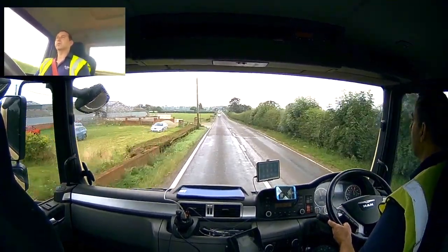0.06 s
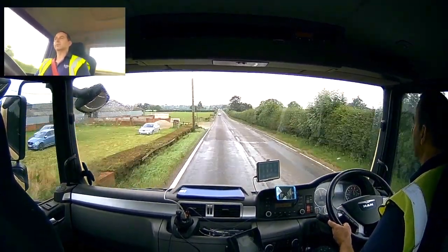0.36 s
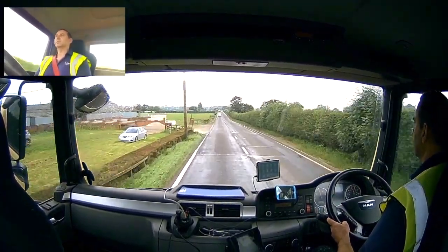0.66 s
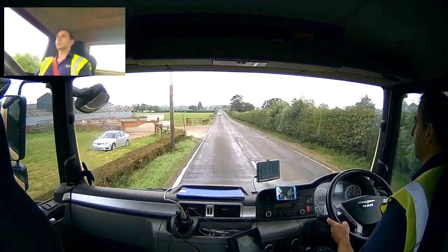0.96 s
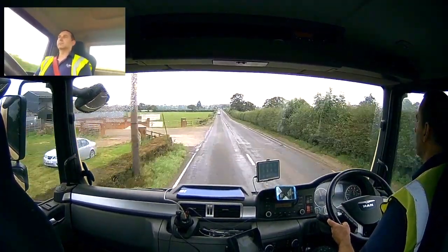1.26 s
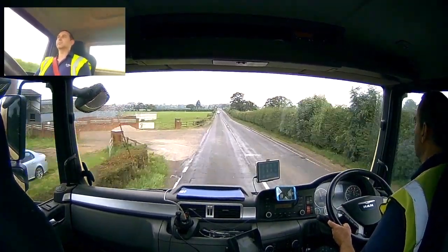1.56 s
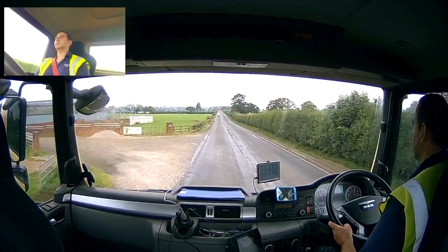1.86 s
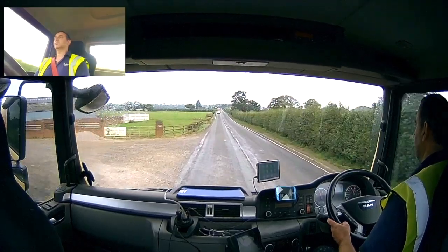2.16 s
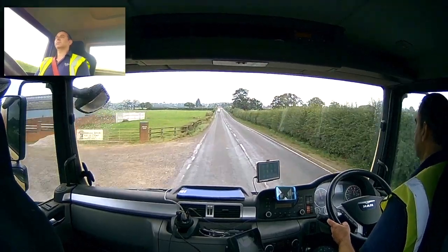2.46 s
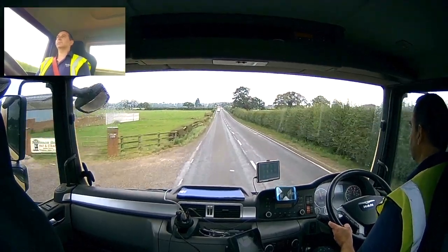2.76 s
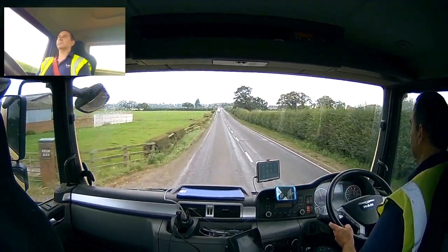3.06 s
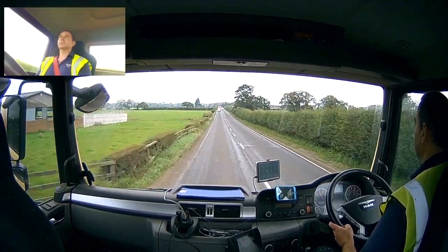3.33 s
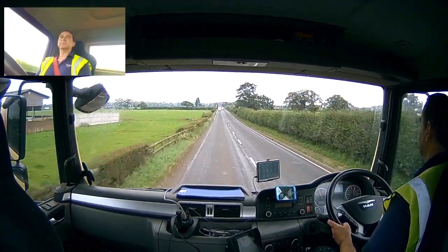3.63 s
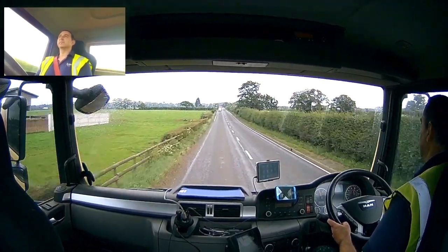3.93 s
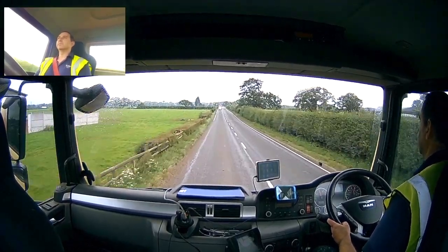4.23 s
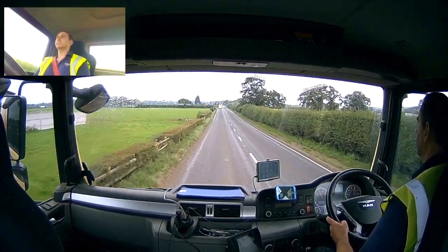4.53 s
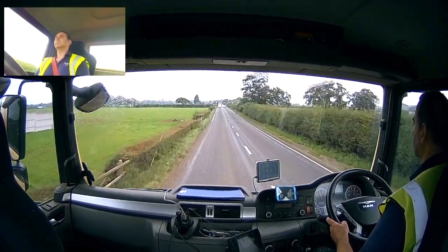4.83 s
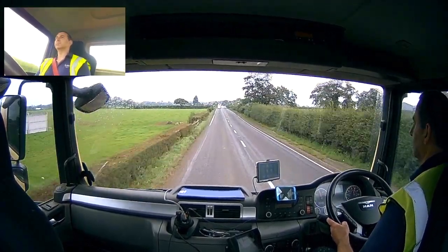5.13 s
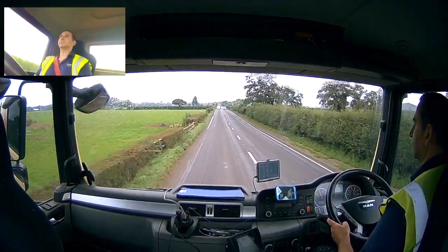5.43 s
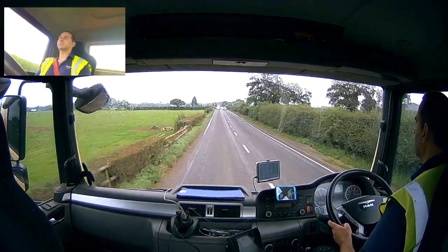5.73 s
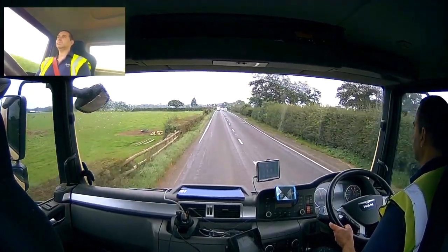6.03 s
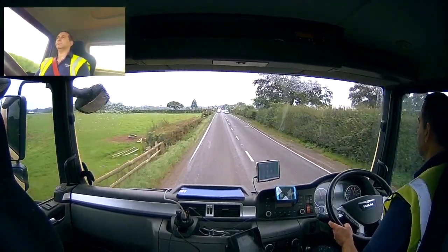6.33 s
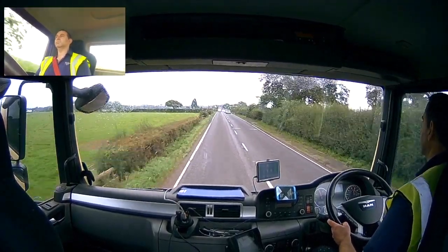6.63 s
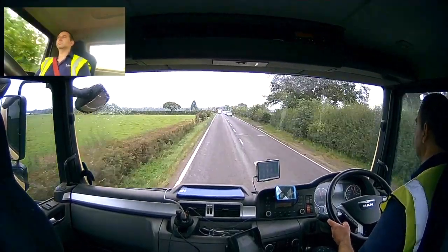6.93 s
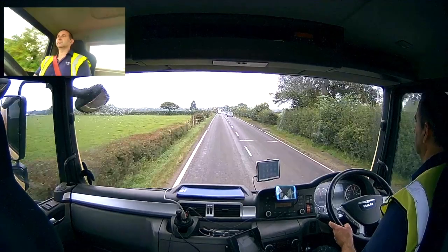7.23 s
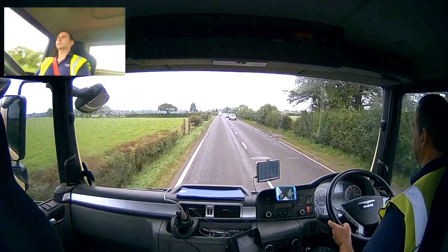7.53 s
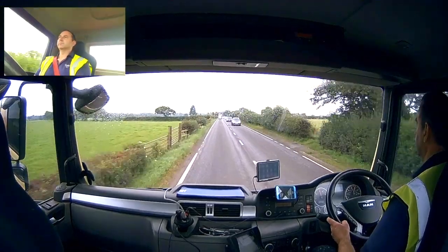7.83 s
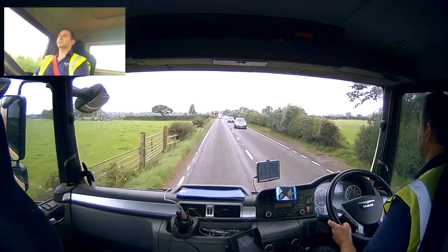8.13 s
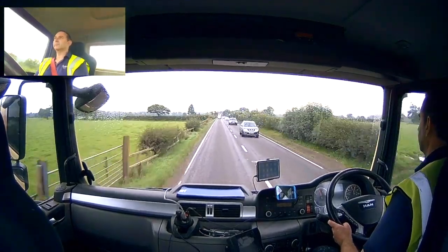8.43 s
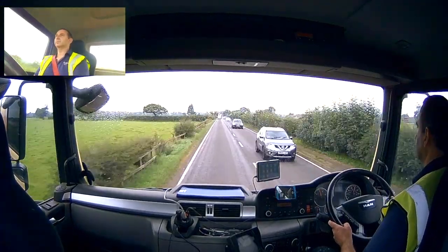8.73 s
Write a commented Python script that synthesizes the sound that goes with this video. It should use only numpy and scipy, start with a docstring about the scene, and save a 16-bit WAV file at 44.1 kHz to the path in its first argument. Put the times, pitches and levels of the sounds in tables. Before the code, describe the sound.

A heavy diesel truck drones inside its cab, with deep road rumble, wet tyre hiss and rattling plastic trim.

```python
"""A heavy six-cylinder truck diesel at about 1500 rpm, heard in the cab on a wet country road.
Uneven firings knock through the engine cover, clatter in the block and shake a loose panel and a clip.
The firing hum swells for a while over thin gear whines. Road rumble and tyre roar fill the cab, and
its air booms for a moment. Wet tyres hiss and splash; plastic trim creaks, ticks and clacks on bumps."""
import sys
import numpy as np
from scipy import signal
from scipy.fft import rfft, irfft, next_fast_len
from scipy.io import wavfile
from scipy.ndimage import uniform_filter1d

SR = 44100
rng = np.random.default_rng(int(sys.argv[2]) if len(sys.argv) > 2 else 0)


def waveform_to_disk(signal):
    """Save audio, clipped to [-1, 1], as 16-bit WAV at the path in sys.argv[1]."""
    frames = np.transpose(np.atleast_2d(signal))
    scaled = np.clip(frames, -1, 1) * 32767
    samples = np.round(scaled).astype(np.int16)
    wavfile.write(sys.argv[1], SR, samples)


N = 387198

# Cylinders in firing order. Each row: knock in dB, panel buzz in dB.
CYLINDERS = [(2.5, -2.5), (-16.5, -6.5), (-11, -5), (-6.5, 0.5), (-1, -1), (-7, -19.5)]
# Engine load. Each row: time in seconds, knock and clatter in relative dB.
LOAD = [(0, -44, -43), (1.4, -36.5, -44), (2, -40.5, -45.5), (2.6, -40, -53.5), (3, -40.5, -43.5),
        (3.5, -34.5, -43), (4.3, -35, -43.5), (5, -39.5, -41.5), (5.7, -38, -41), (6.3, -42.5, -39),
        (7.1, -41, -37), (8.78, -43.5, -41.5)]
# Road surface. Each row: time in seconds, rumble and tyre roar in relative dB.
SURFACE = [(0, -16, -25), (1.3, -21.5, -26), (2.4, -19.5, -27), (3.3, -17, -25.5), (4.4, -17.5, -26),
           (5.4, -17, -25), (6.6, -17.5, -24.5), (7.2, -16.5, -24.5), (7.6, -18.5, -25),
           (8.78, -19.5, -25.5)]
# Cab rumble. Each row: frequency in Hz, gain in dB.
RUMBLE_SPECTRUM = [(18, -18), (28, -16.5), (40, -2), (50, -13.5), (64, 2), (76, -6), (100, 1.5), (140, 0),
                   (180, -1.5), (215, -8), (280, -17.5), (450, -40.5)]
# Ring of the plastic trim. Each row: frequency in Hz, gain in dB.
TRIM_SPECTRUM = [(800, 6.5), (1800, 14.5), (3600, 3), (5500, -4.5), (7200, -7), (9500, -8), (11000, -11.5),
                 (12800, -10.5), (15500, -17)]


def undb(db):
    """Decibels to gain."""
    return 10 ** (np.asarray(db) / 20)


def unit(x):
    """Scale to rms 1."""
    return x / np.sqrt(np.mean(x ** 2))


def curves(table):
    """Each column of (seconds, ..) rows, interpolated per sample."""
    s, *columns = np.transpose(table)
    return [np.interp(np.arange(N) / SR, s, c) for c in columns]


def stretches(table, edge_s):
    """Gain of (start s, length s, dB) rows that fade in, hold and fade out."""
    t = np.arange(N) / SR
    return sum(undb(db) * np.clip(np.minimum(t - s, s + length_s - t) / edge_s + .5, 0, 1)
               for s, length_s, db in table)


def response(points, hz):
    """Gain of (Hz, dB) points on a log-frequency axis."""
    f, db = np.transpose(points)
    return undb(np.interp(np.log(hz + 1), np.log(f), db))


def colour(x, points):
    """Filter by a (Hz, dB) spectrum that falls away beyond its ends."""
    size = next_fast_len(N, real=True)
    hz = np.fft.rfftfreq(size, 1 / SR)
    ends = np.minimum(hz / points[0][0], 1) ** 2 / np.maximum(hz / points[-1][0], 1) ** 2
    return irfft(rfft(x, size) * response(points, hz) * ends, size)[..., :N]


def pan(db):
    """Stereo gains for a pan of left minus right in dB."""
    return undb(np.array([[db], [-db]]) / 2)


def resonate(x, hz, width_hz):
    """One resonance, unity gain at its peak."""
    return signal.lfilter(*signal.iirpeak(hz, hz / width_hz, SR), x)


def ring(x, modes):
    """Drive resonances, each with its own place in the cab."""
    return sum(undb(db) * pan(pan_db) * resonate(x, hz, width_hz) for hz, width_hz, db, pan_db in modes)


def walk(rate_hz):
    """Slow drift: random steps smoothed twice, rms 1."""
    hold = int(SR / rate_hz)
    steps = np.repeat(rng.standard_normal(N // hold + 1), hold)
    return unit(uniform_filter1d(uniform_filter1d(steps, hold), hold)[:N])


def bursts(hits, decay_s):
    """Each impulse starts a decaying burst of stereo noise."""
    return signal.lfilter([1], [1, -np.exp(-1 / (decay_s * SR))], hits) * rng.standard_normal((2, N))


def grains(per_s, spread_db, decay_s):
    """Tiny bursts of random timing and size."""
    hits = rng.random(N) < per_s / SR
    sizes = undb(spread_db * np.minimum(rng.exponential(size=N), 3))
    return bursts(hits * sizes, decay_s)


def cab_noise():
    """Noise in a small cab: long waves reach both sides alike, short ones do not."""
    # Stereo width. Each row: frequency in Hz, side minus mid in dB.
    width = [(40, -16.5), (125, -18), (250, -10.5), (500, -9), (1000, 2.5), (2000, -0.5)]
    size = next_fast_len(N, real=True)
    mid, side = rng.standard_normal((2, size))
    side = irfft(rfft(side) * response(width, np.fft.rfftfreq(size, 1 / SR)), size)
    return np.array([mid + side, mid - side])[:, :N]


def standing_waves(x):
    """The cab's standing waves bring one source to the two sides out of step."""
    # Phase between sides. Each row: frequency in Hz, left lead in radians.
    leads = [(700, 0), (1250, .4), (1450, 1.4), (1750, 3), (2550, 3.3), (2950, 6.2), (3500, 6.3),
             (4200, 3.8)]
    size = next_fast_len(N, real=True)
    lead_rad = np.interp(np.fft.rfftfreq(size, 1 / SR), *np.transpose(leads))
    return irfft(rfft(x, size) * np.exp(.5j * np.array([lead_rad, -lead_rad])), size)[:, :N]


def near_noise(diffuse_db=-5):
    """Noise of one nearby part, with diffuse sound around it."""
    return standing_waves(rng.standard_normal(N)) + undb(diffuse_db) * rng.standard_normal((2, N))


def cab_walls(x, count=8, gain=0.19):
    """Glass and dash return different early echoes to each side."""
    lags = (rng.uniform(0.0011, .012, (2, count)) * SR).astype(int)
    return np.array([side + gain * sum(np.roll(side, lag) for lag in row) for side, row in zip(x, lags)])


def firings(cycles, cylinder_db, scatter_db, decay_s):
    """Force of six firings a cycle: each has its own strength and dies away."""
    count = len(cylinder_db)
    number = (cycles * count).astype(int)
    age_s = (cycles - number / count) / np.gradient(cycles) / SR
    chance = rng.standard_normal(number[-1] + 1)
    return undb(cylinder_db[number % count] + scatter_db * chance[number]) * np.exp(-age_s / decay_s)


def knock(cycles, rasp=.17):
    """Combustion blows, rounded by the hollow under the engine cover, ring the cover."""
    # Cover modes. Each row: frequency and width in Hz, gain and pan in dB.
    cover_modes = [(1188, 17, -12.5, 4), (1253, 42, 0.5, -4.5), (1392, 40, -3.5, -10.5)]
    force = firings(cycles, np.transpose(CYLINDERS)[0], scatter_db=.7, decay_s=0.02)
    blow = np.maximum(np.diff(force, prepend=force[0]), 0)
    push = (unit(blow) + rasp * unit(force * rng.standard_normal(N))) * undb(.8 * walk(4))
    hollow = resonate(push, hz=1270, width_hz=190)
    cover = ring(standing_waves(hollow), cover_modes)
    cover = colour(cover, [(950, -16), (1150, 4.5), (1260, 0), (1370, -6), (1700, -10.5)])
    return unit(cover) * undb(curves(LOAD)[0] - 2)


def clatter(cycles):
    """All six cylinders ring the block, more evenly than they knock."""
    # Block modes. Each row: frequency and width in Hz, gain and pan in dB.
    block_modes = [(1449, 45, 3.5, -5.5), (1540, 67, -8, -13), (1525, 110, -2.5, -10), (1660, 23, -8, -6),
                   (1769, 20, -2.5, -7), (2000, 76, -14.5, -2)]
    force = firings(cycles, 0.2 * np.transpose(CYLINDERS)[0], scatter_db=0.8, decay_s=0.07)
    block = colour(ring(force * near_noise(), block_modes), [(1100, 0), (2200, -0.5)])
    return unit(block) * undb(curves(LOAD)[1] + 1.5)


def panel_buzz(cycles):
    """The firings shake a loose panel; its level follows the clatter."""
    # Panel modes. Each row: frequency and width in Hz, gain and pan in dB.
    panel_modes = [(2464, 76, -1, -14), (2568, 24, 3.5, -27), (3273, 65, -1.5, 8.5), (3770, 22, 2.5, -1.5),
                   (3935, 60, -8, -7)]
    shake = firings(cycles, np.transpose(CYLINDERS)[1], scatter_db=3, decay_s=0.049)
    panel = ring(shake * near_noise(), panel_modes)
    panel = colour(panel, [(2000, 14), (2500, -1.5), (4000, 2.5), (5000, -7), (13000, -8.5)])
    return unit(panel) * undb(0.82 * curves(LOAD)[1] - 15)


def clip_rattle(cycles):
    """The firings shake a small clip into fine bright ticks."""
    # Shake per cylinder in dB.
    shake_db = [-4.5, -6.5, -6.5, -11.5, -4, -8.5]
    # Clip modes. Each row: frequency and width in Hz, gain and pan in dB.
    clip_modes = [(6400, 700, 0, -4.5), (9500, 1800, -1.5, 4.5), (12650, 670, -4.5, 7)]
    shake = firings(cycles, np.array(shake_db), scatter_db=3, decay_s=.003)
    clip = colour(ring(shake * rng.standard_normal((2, N)), clip_modes), [(6000, 0.011), (13000, 0)])
    return unit(clip) * undb(0.36 * curves(LOAD)[1] - 55)


def hum(cycles):
    """Harmonics of the firing rate waver in level and phase."""
    # Hum partials. Each row: multiple of the firing rate, relative level in dB.
    harmonics = [(2, -3), (3, 2), (5, 3.5), (6, -4.5), (7, -6.5), (8, -28.5)]
    # Hum swell. Each row: time in seconds, level in dB.
    levels = [(0, -49), (3, -46), (5.4, -36.5), (6.1, -28), (7.1, -27.5), (7.8, -31.5), (8.8, -35)]
    firing_rad = 2 * np.pi * len(CYLINDERS) * cycles
    tones = 0
    for multiple, db in harmonics:
        gain = undb(db + 1.3 * walk(12))
        tones += gain * np.sin(multiple * firing_rad + 0.68 * walk(20) + rng.uniform(0, 2 * np.pi))
    return unit(tones) * undb(curves(levels)[0]) * pan(1.5)


def gear_whine(cycles):
    """Two gears whine thinly at high multiples of the engine cycle."""
    # Gear tones, upper then lower, in multiples of the cycle rate.
    multiples = [87.6, 72]
    # Pan per gear in dB.
    pans_db = [-9, -2]
    # Whine levels. Each row: time in seconds, upper and lower gear in dB.
    levels = [(0, -49.5, -64), (1.8, -48.5, -63), (2.3, -54, -62), (3.7, -55, -55), (4.4, -57, -48.5),
              (4.8, -63, -53), (7.1, -63, -48.5), (8.8, -63, -57)]
    whine = 0
    for multiple, pan_db, db in zip(multiples, pans_db, curves(levels)):
        gain = undb(db + 2 * walk(6.5)) * pan(pan_db)
        whine += gain * unit(np.sin(2 * np.pi * multiple * cycles + .5 * walk(10)))
    return whine


def road_swing_db():
    """Brief rounded surges and lulls of the road noise."""
    # Swells. Each row: centre and length in seconds, change in dB.
    swells = [(0.294, 0.2, -6), (0.832, 0.082, -4.5), (1.598, 0.35, 3), (1.738, 0.24, -4),
              (2.016, 0.16, -6), (2.532, 0.15, -4.5), (3.134, 0.14, -6), (4.855, 0.17, -8.5),
              (5.363, 0.15, -6.5)]
    t = np.arange(N) / SR
    return sum(db * np.cos(np.pi * np.clip((t - s) / length_s, -.5, .5)) ** 2
               for s, length_s, db in swells)


def rumble():
    """The road shakes the cab on its mounts."""
    return unit(colour(cab_noise(), RUMBLE_SPECTRUM)) * undb(curves(SURFACE)[0] + road_swing_db())


def bounce(rest_db=-40.5):
    """The cab bounces on its mounts with a deep shudder."""
    # Bounces. Each row: start and length in seconds, level in dB.
    bounces = [(0, 0.88, -29.5), (3, 0.26, -33)]
    shudder = colour(cab_noise(), [(22, -2.5), (30, -6), (38, 6.5), (52, -6), (80, -10)])
    return unit(shudder) * (undb(rest_db) + stretches(bounces, edge_s=0.21)) * pan(-1)


def tyre_roar(cycles):
    """Tyre noise booms in the cab's panels; the firings throb through it."""
    # Roar. Each row: frequency in Hz, gain in dB.
    spectrum = [(120, -12.5), (260, 1), (340, 1.5), (420, -2), (490, -2), (620, -3.5), (690, -7),
                (800, -13), (1050, -17.5), (1400, -19), (1750, -28), (2050, -31.5), (3500, -36.5),
                (6000, -52)]
    # Cab panel modes. Each row: frequency and width in Hz, gain and pan in dB.
    boom_modes = [(484.4, 57, -5, 9.5), (599.6, 16.2, 1.5, -4.5)]
    throb = 1 + 0.079 * np.cos(2 * np.pi * len(CYLINDERS) * cycles)
    tyres = colour(cab_noise(), spectrum) * throb
    level_db = curves(SURFACE)[1] + 0.44 * road_swing_db() + 1.37
    return unit(tyres + ring(tyres, boom_modes)) * undb(level_db)


def tyre_water(onset_s=0.028, runoff_s=0.1):
    """Wet tyres throw a steady spray and splash through wetter patches."""
    # Spray hiss. Each row: frequency in Hz, gain in dB.
    hiss_spectrum = [(900, -6), (1800, 10.5), (2800, 4.5), (4200, 2.5), (5200, -3.5), (7000, -8),
                     (8700, -8.5), (10800, -17.5), (12600, -15.5), (15500, -22)]
    # Spray strength. Each row: time in seconds, level in dB.
    spray_levels = [(0, -46.5), (1, -52), (2.5, -52), (4, -50.5), (5.5, -50), (6.6, -48), (8.8, -48)]
    # Water on the wheel arch. Each row: frequency in Hz, gain in dB.
    splash_spectrum = [(1000, 7.5), (1800, 16.5), (2900, 3), (3900, 10), (5000, -3), (8500, -7),
                       (11000, -14.5), (13500, -12.5), (15500, -26)]
    # Wetter patches. Each row: start and length in seconds, level in dB.
    patches = [(5.33, .14, -49), (6.668, 0.15, -41), (7.192, 0.34, -46)]
    spray = unit(colour(cab_walls(cab_noise()), hiss_spectrum)) * undb(curves(spray_levels)[0])
    t = np.arange(N) / SR
    wetness = 0
    for s, length_s, db in patches:
        onset = np.clip((t - s) / onset_s + .5, 0, 1)
        wetness += undb(db) * onset * np.exp(-np.maximum(t - s - length_s, 0) / runoff_s)
    drops = grains(per_s=1000, spread_db=1, decay_s=0.0043)
    splash = unit(colour(drops, splash_spectrum)) * wetness
    return (spray + splash) * undb(0.88 * walk(14)) * pan(.8)


def trim_creak(rest_db=-62):
    """Plastic joints creak in many tiny slips, louder on rough road."""
    # Rough stretches. Each row: start and length in seconds, relative level in dB.
    rough = [(0, 0.26, -45), (.42, 0.35, -50.5), (2.86, 0.36, -51), (4.45, 0.2, -59), (7.99, 0.3, -45.5)]
    slips = grains(per_s=480, spread_db=2.5, decay_s=0.0018)
    gain = np.hypot(undb(rest_db), stretches(rough, edge_s=0.026)) * undb(3)
    return unit(colour(slips, TRIM_SPECTRUM)) * gain * pan(1.2)


def panel_chatter(cycles, touch_phase=.52, rise_s=0.004, decay_s=0.0081):
    """The loose panel's edge taps its frame once a cycle, now and then hard; it chirps and rings."""
    # Hard taps. Each row: start in seconds, edge chirp and ring in dB.
    hard_taps = [(1.14, -51, -43), (1.227, -47, -43), (1.479, -49.5, -45), (1.721, -37.5, -43),
                 (1.976, -49, -45), (3.404, -53, -41), (4.358, -47, -42), (4.518, -47, -43),
                 (4.6, -49, -40), (4.675, -54, -34.5), (4.753, -54, -44), (4.911, -45, -42),
                 (5.152, -48, -39), (5.231, -53, -41), (5.642, -43, -57), (6.662, -47, -36),
                 (6.735, -43, -37), (7.041, -48, -43), (7.122, -51, -38), (7.262, -47, -36),
                 (7.422, -46, -54), (7.511, -46, -38), (7.732, -45, -41), (7.891, -48, -40),
                 (8.284, -46, -41), (8.445, -49, -42), (8.546, -43, -52)]
    # Edge chirp. Each row: frequency in Hz, gain in dB.
    edge_spectrum = [(2000, -19.5), (2550, -1.5), (2900, -11), (3270, 6), (3520, 2.5), (3800, 12),
                     (4300, -28), (6000, -34)]
    # Modes of the tapped panel. Each row: frequency and width in Hz, gain and pan in dB.
    tap_modes = [(2446, 110, -2, -6), (2544, 41, 0, -6.5), (3230, 70, -9, 4.5)]
    touches = np.flatnonzero(np.diff(np.floor(cycles - touch_phase)))
    shakes = np.zeros(N)
    shakes[touches] = undb(curves(LOAD)[1][touches] + 1.5 * rng.standard_normal(len(touches)))
    edge_hits, ring_hits = shakes * undb(-15), shakes * undb(-10)
    for s, edge_db, ring_db in hard_taps:
        edge_hits[int(s * SR)] += undb(edge_db)
        ring_hits[int(s * SR)] += undb(ring_db)
    age_s = np.arange(SR // 12) / SR
    chirp_gain = signal.oaconvolve(edge_hits, age_s / rise_s * np.exp(1 - age_s / rise_s))[:N]
    fade = (1 - np.exp(-age_s / rise_s)) * np.exp(-age_s / decay_s)
    ring_gain = signal.oaconvolve(ring_hits, fade / fade.max())[:N]
    ringing = colour(ring(near_noise(), tap_modes), [(2400, 0), (3400, 0)])
    return chirp_gain * unit(colour(near_noise(), edge_spectrum)) + ring_gain * unit(ringing)


def clacks(cutoff_hz=5960):
    """Loose plastic on the right hits the trim over bumps: short, hard and dry."""
    # Impacts. Each row: start in seconds, relative level in dB.
    impacts = [(.0273, -27), (0.1116, -26.5), (.18, -28), (0.397, -30.5), (0.4702, -32), (.6714, -31.5),
               (0.7055, -33), (.7397, -29), (.7657, -38), (0.8102, -28), (0.878, -33.5)]
    hits = np.zeros(N)
    for s, db in impacts:
        hits[int(s * SR)] = undb(db)
    force = signal.lfilter(*signal.butter(2, cutoff_hz, fs=SR), bursts(hits, decay_s=0.0032))
    return colour(force, TRIM_SPECTRUM) * pan(-5.5)


def trim_ticks(rise_s=0.0003, low_hz=5000, low_db=-3, top_hz=10000):
    """Plastic joints slip in single short scrapes."""
    # Slips. Each row: start in seconds, relative level in dB, decay in seconds, treble and ring in dB.
    ticks = [(0.079, -35.5, 0.0089, -7, -3), (0.186, -43, .008, 2, -9), (0.213, -41.5, 0.016, -5, -1),
             (0.455, -47, 0.0087, 10, -9), (0.5283, -41, 0.0087, -2, -8), (0.569, -41, .004, -2, -6),
             (0.636, -38.5, 0.0082, -2, -9), (0.678, -44, 0.0083, -4, -9), (1.788, -42.5, .009, -22, -14),
             (2.683, -44.5, 0.011, -10, -6), (2.883, -41, .007, -3, -6), (3.16, -42, .01, -4, -4),
             (3.721, -43, 0.0081, 2, 8), (4.223, -40, 0.006, 3, 5), (4.601, -44, .008, 0, 0),
             (4.6867, -43, .008, -5, -6), (8.0212, -38.5, 0.014, 2, -9), (8.041, -38, 0.0065, 7, -9),
             (8.088, -46, .007, 17, -9), (8.2513, -37.5, 0.011, 4, -9), (8.463, -35.5, 0.0099, 2, -9)]
    force = np.zeros((2, N))
    t = np.arange(SR // 16) / SR
    low_pass = signal.butter(2, low_hz, fs=SR)
    high_pass = signal.butter(2, top_hz, "high", fs=SR)
    for s, db, decay_s, top_db, ring_db in ticks:
        slip = rng.standard_normal((2, len(t))) * np.exp(-t / decay_s) * (1 - np.exp(-t / rise_s))
        low_shelf = (undb(low_db) - 1) * signal.filtfilt(*low_pass, slip)
        top_shelf = (undb(top_db) - 1) * signal.filtfilt(*high_pass, slip)
        ringing = undb(ring_db) * resonate(slip, hz=5540, width_hz=980)
        tick = undb(db + 7) * (slip + low_shelf + top_shelf + ringing)
        start = int(s * SR)
        force[:, start:start + len(t)] += tick[:, :N - start]
    return colour(force, TRIM_SPECTRUM)


def air_boom():
    """The cab's air booms on its lowest resonance, a wave so long that both sides hear it alike."""
    # Booms. Each row: start and length in seconds, level in dB.
    booms = [(4.95, 1.66, -25)]
    air = resonate(colour(rng.standard_normal(N), RUMBLE_SPECTRUM), hz=118.6, width_hz=37)
    return unit(air) * stretches(booms, edge_s=0.35) * undb(road_swing_db())


def scene():
    """One crankshaft times the engine, its rattles and the throb; road, water and trim join in."""
    # Engine speed. Each row: time in seconds, four-stroke cycle rate in Hz.
    speed = [(0, 12.37), (.6, 12.39), (1.4, 12.46), (2.2, 12.39), (3, 12.49), (4.3, 12.54), (5.2, 12.66),
             (6.5, 12.76), (8.8, 12.72)]
    cycles = .33 + np.cumsum(curves(speed)[0]) / SR
    engine = knock(cycles) + clatter(cycles)
    loose_parts = panel_buzz(cycles) + panel_chatter(cycles) + clip_rattle(cycles)
    tones = hum(cycles) + gear_whine(cycles)
    road = rumble() + air_boom() + bounce() + tyre_roar(cycles) + tyre_water()
    return engine + loose_parts + tones + road + trim_ticks() + trim_creak() + clacks()


def record(dry):
    """A steep low-pass cuts the top treble."""
    cutoff_hz = 15700
    return signal.sosfilt(signal.ellip(10, .2, 80, cutoff_hz, fs=SR, output="sos"), dry)


dry = scene()
out = record(dry)
waveform_to_disk(out)
```